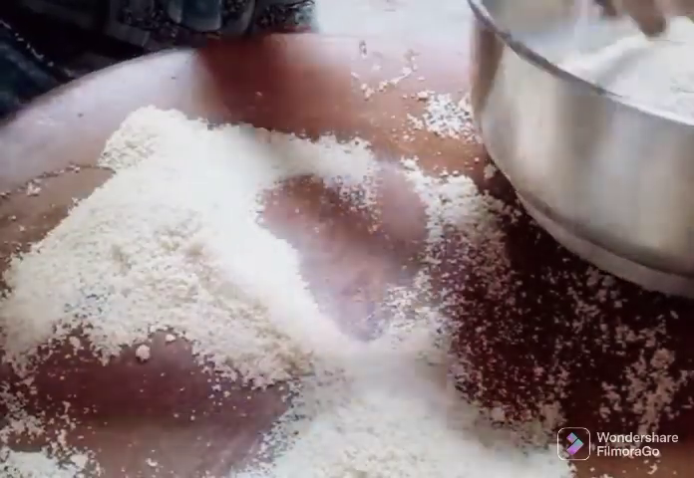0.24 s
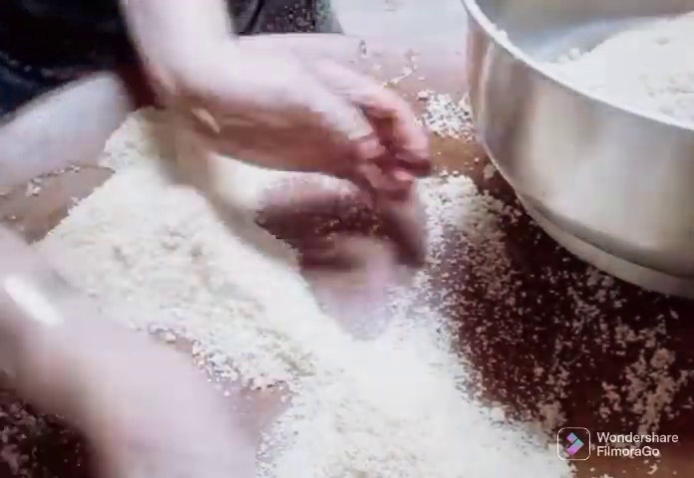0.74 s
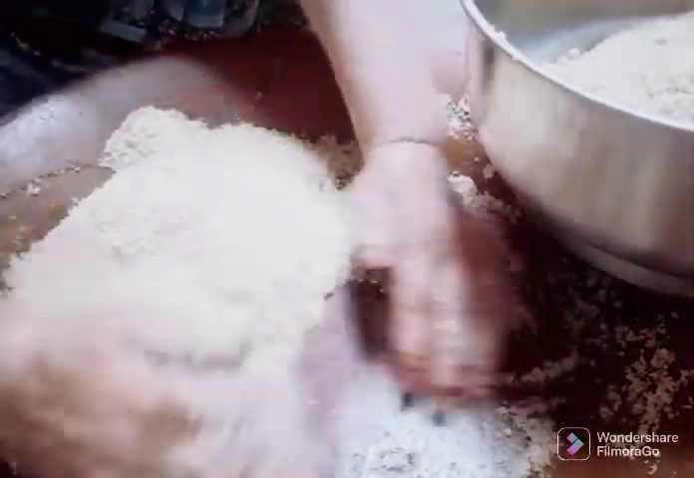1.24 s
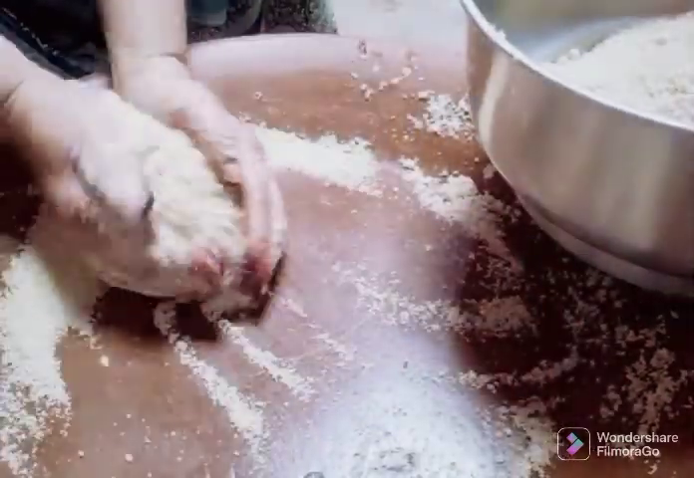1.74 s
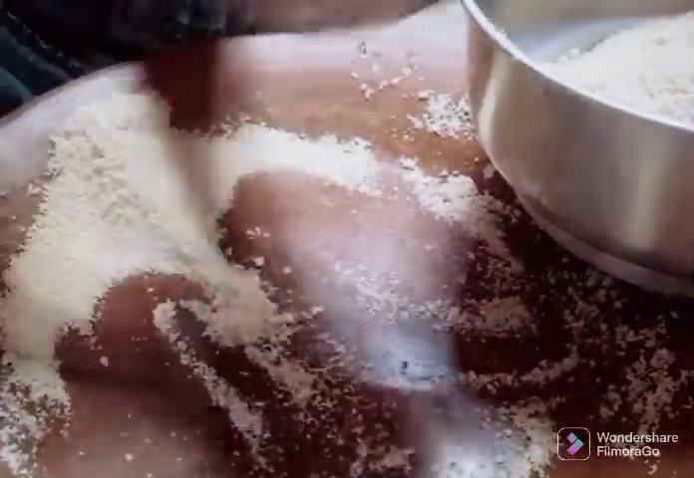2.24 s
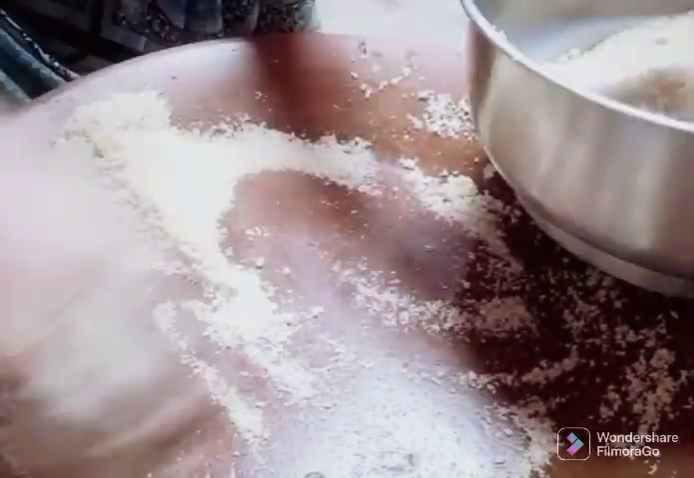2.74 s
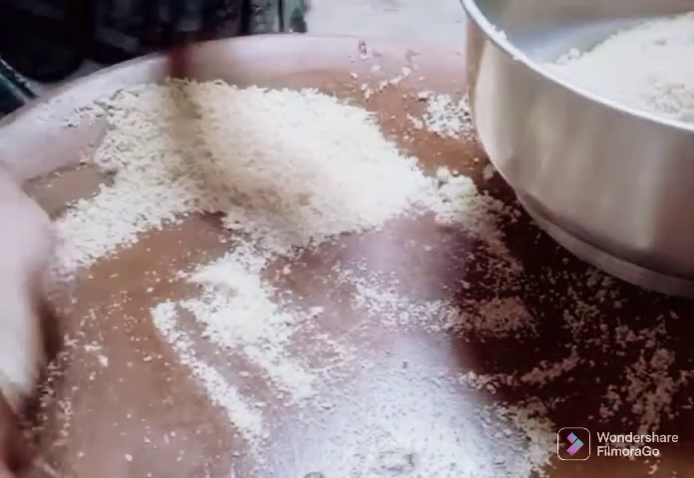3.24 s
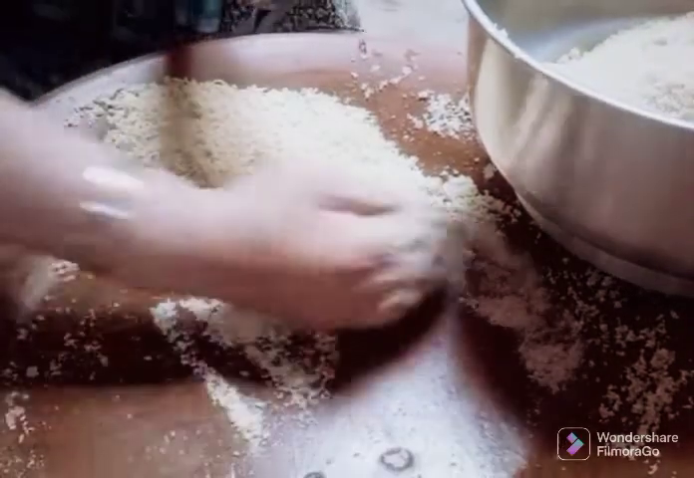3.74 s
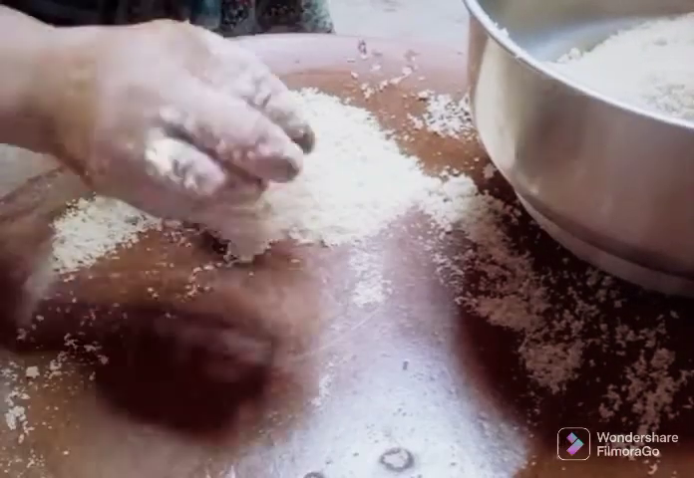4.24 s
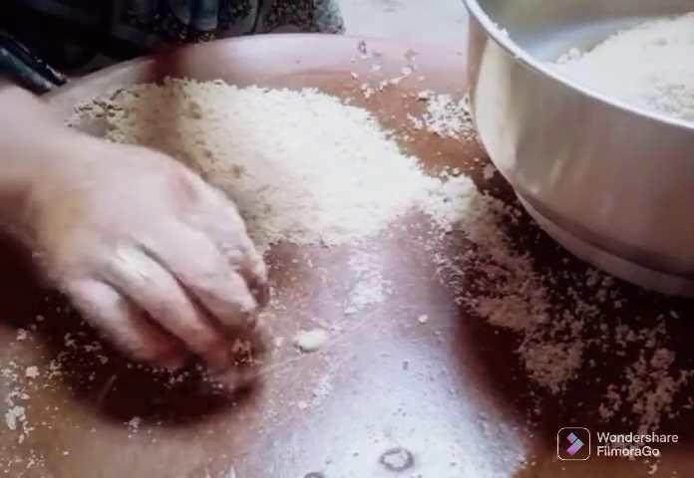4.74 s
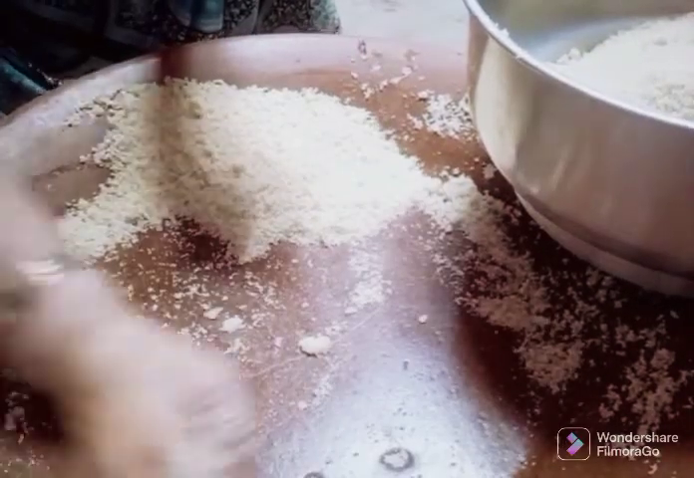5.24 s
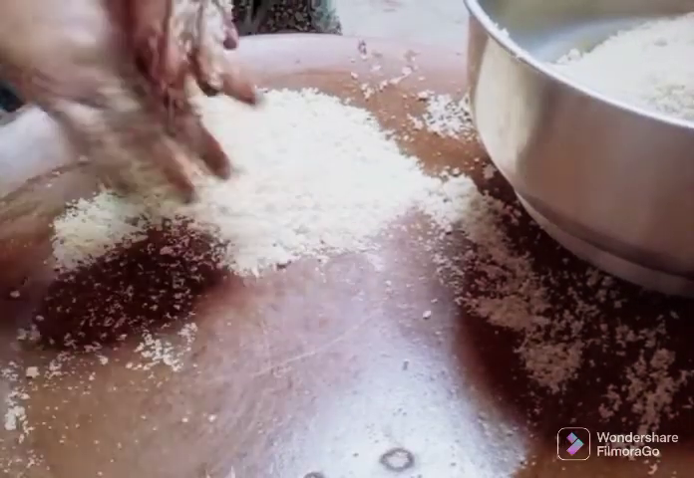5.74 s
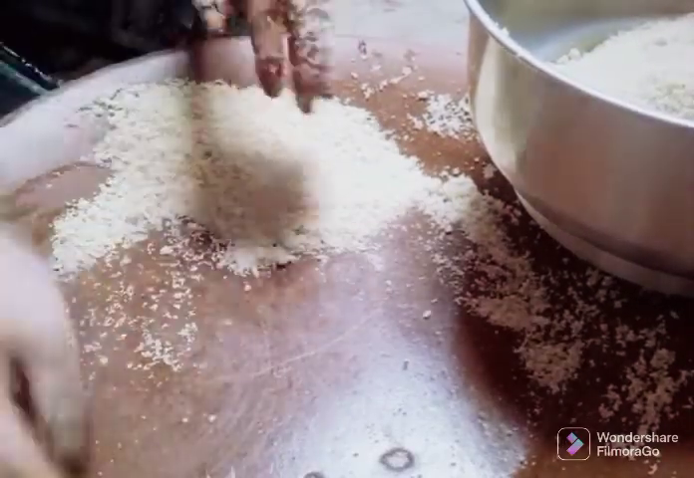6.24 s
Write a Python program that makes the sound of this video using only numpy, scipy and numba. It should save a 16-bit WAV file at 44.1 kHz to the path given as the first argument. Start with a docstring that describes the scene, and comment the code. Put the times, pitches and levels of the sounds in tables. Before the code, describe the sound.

Close up in a small quiet kitchen, hands sweep moist grain round a wooden platter in uneven gritty swishes with a hollow murmur under the palm. Early on, a small hard object clatters briefly. Pats and a firm slap follow, with a thin hiss of sliding grain. Later the platter knocks its support four times, loud and woody, the last a quick double, then rubbing continues.

```python
"""A soft, grainy swish comes and goes as hands rub and roll moist semolina round a wide wooden platter.
Each stroke drags many grains over the wood: they scrape, fizz, and drum the hollow under the palm and the platter.
The hands slap and pat now and then, loose grain patters and hisses, and a small hard thing clatters down.
Once the platter knocks four times on its support, the last knock a quick double; a small kitchen hums faintly.
Grain is random slips shaped by filters; struck things are fading sines, short pulses and noise bursts."""
import sys
import numpy as np
from scipy import signal
from scipy.fft import rfft, irfft
from scipy.io import wavfile
from numba import njit

SR = 44100
rng = np.random.default_rng(int(sys.argv[2]) if len(sys.argv) > 2 else 0)


def dump(signal):
    """Clip the signal to [-1, 1] and save it as 16-bit WAV at the path in sys.argv[1]."""
    limited = np.clip(np.atleast_2d(signal).T, -1, 1)
    pcm = np.round(limited * 32767).astype(np.int16)
    wavfile.write(sys.argv[1], SR, pcm)


N = 286322
TIME = np.arange(N) / SR
ROOM_T60_S, EAR_SPACING_S = 0.45, 0.00037  # fading of the room by 60 dB; sound's travel between the microphones
FLURRY_DB, FLURRY_RATE = 1.6, 22  # loose grain comes in flurries: spread in dB, changes a second

# sweeps of a hand over the grain: [full speed reached t/s, attack/s, hold/s, release/s,
# scrape level/dB, fizz of loose grain level/dB, hollow under the palm level/dB, platter rumble level/dB,
# cupping of the palm 0-1, hollow f/Hz, its glide/(octaves per s)]
STROKES = [(0.01, 0.058, 0.052, 0.14, -32, -44, -31.5, -42.5, 0.08, 522, 4.5),
           (0.302, 0.07, 0.035, 0.094, -36, -47, -37, -51, 0.42, 610, -4),
           (0.38, 0.04, 0.032, 0.14, -38.5, -47, -36.5, -46, 0.5, 710, -3),
           (0.804, 0.045, 0.023, 0.074, -37.5, -45, -37.5, -49, 0.4, 597, -8.5),
           (0.931, 0.029, 0.032, 0.12, -32, -42, -35, -45, 0.1, 660, -4.5),
           (1.093, 0.063, 0.059, 0.26, -41, -59, -46, -53.5, 0, 1030, -2.5),
           (1.187, 0.03, 0.03, 0.091, -50.5, -72, -45, -64, 0.5, 526, 2),
           (1.356, .10, 0.067, 0.027, -38.5, -51, -43.5, -78, 0.65, 960, -5.5),
           (1.487, 0.046, 0.034, 0.078, -33.5, -46, -30.5, -59, 0.72, 445, 2.5),
           (1.77, 0.025, 0.013, 0.028, -45.5, -60, -43, -45, 0.94, 240, 2),
           (1.812, 0.027, 0.0079, 0.019, -45, -47, -30, -35.5, 1, 490, -3),
           (1.88, 0.06, 0.036, 0.018, -30, -42, -27.5, -36.5, 0.4, 814, -1.5),
           (1.932, 0.025, 0.072, 0.06, -30.5, -46, -29, -47, 0.6, 638, -1),
           (2.015, 0.02, 0.021, 0.014, -42.5, -60, -37, -69, 0.91, 572, 1),
           (2.098, 0.034, 0.03, 0.035, -42, -48, -67, -71, 1, 533, 1),
           (2.232, 0.057, 0.038, 0.082, -33, -44, -39, -45, 0.97, 620, 1),
           (2.28, 0.058, 0.03, 0.11, -34, -52, -37.5, -46, 0.16, 610, -6),
           (2.513, 0.053, 0.014, 0.063, -32, -46, -39.5, -65, 0.48, 572, -4),
           (2.815, 0.061, 0.025, 0.036, -36.5, -47, -32.5, -38, 0.06, 730, -4),
           (2.897, 0.059, 0.06, 0.088, -29.5, -39, -29, -41, 0.27, 577, 0.1),
           (3.011, 0.03, 0.032, 0.09, -37, -58, -33.5, -45.5, 0.1, 636, -1),
           (3.237, 0.055, 0.026, 0.14, -31.5, -44.5, -31, -39, 0.01, 580, 2),
           (3.57, 0.12, 0.027, 0.1, -33, -40, -40, -47, 0.17, 622, -4.5),
           (3.805, 0.0056, 0.03, 0.059, -40, -44, -30.5, -47, 0.6, 484, 1),
           (3.902, 0.055, 0.13, 0.1, -29, -41.5, -31.5, -44.5, 0, 730, -1.5),
           (4.227, 0.016, 0.03, 0.034, -39.5, -47, -42, -54, 0.6, 1290, -6.5),
           (4.33, 0.091, 0.042, .14, -32.5, -48.5, -35.5, -41.5, 0, 718, -5.5),
           (4.598, 0.088, 0.021, 0.13, -37.5, -52, -43.5, -62, 0, 613, -8.5),
           (4.88, 0.019, 0.036, 0.047, -44, -53, -32, -48, 0.84, 510, 2),
           (4.99, 0.081, 0.099, 0.094, -29.5, -42, -32, -46, 0.04, 671, 0.5),
           (5.168, 0.044, 0.017, 0.034, -46.5, -68, -47, -69, 0.8, 612, 0.5),
           (5.374, 0.099, 0.039, 0.14, -30.5, -42.5, -35, -42, 0.1, 574, -3.5),
           (5.64, 0.013, 0.072, 0.051, -40, -46.5, -49, -56.5, 0.8, 610, -12),
           (5.961, 0.059, 0.078, 0.087, -30, -39.5, -33.5, -45, 0, 642, -2.5),
           (6.089, 0.072, 0.027, 0.099, -32.5, -54, -31.5, -56, 0.64, 544, 0.5),
           (6.187, 0.022, 0.024, 0.042, -52, -65, -41.5, -56, 0.55, 592, 0),
           (6.378, 0.099, 0.042, 0.26, -31.5, -44, -36, -42.5, 0.01, 585, 2.5)]
# colour of fizzing loose grain: [f/Hz, level per Hz/dB]
FIZZ_COLOUR = [(1500, -29), (3200, 2.5), (4200, -2.5), (5200, -2), (6300, 0), (7200, -9), (8200, -22.5),
               (9500, -31), (12000, -37.5), (15500, -36.5)]


def undb(db):
    """Turn decibels into a gain."""
    return 10 ** (np.asarray(db) / 20)


def unit(x):
    """Scale to an rms (average strength) of 1."""
    return x / np.sqrt(np.mean(x ** 2))


def log_gain(points, size):
    """Natural log of a colour's gain at each frequency of a transform."""
    hz, db = np.transpose(points)
    log_hz = np.log(np.fft.rfftfreq(size, 1 / SR) + 1)
    return np.log(undb(np.interp(log_hz, np.log(hz), db)))


def colour(x, points):
    """Filter by a list of (Hz, dB) points."""
    size = x.shape[-1]
    return irfft(rfft(x) * np.exp(log_gain(points, size)), size)


def pulse(points, size=2048):
    """A pulse of the given colour with its energy packed as early as possible, peak 1."""
    cepstrum = irfft(log_gain(points, size))
    # folding the second half onto the first makes the pulse start at once
    cepstrum[1:size // 2] *= 2
    cepstrum[size // 2:] = 0
    wave = irfft(np.exp(rfft(cepstrum)))
    return wave / np.abs(wave).max()


def fade(t, t60):
    """Fade exponentially, by 60 dB in t60 seconds."""
    return np.exp(-np.log(1000) * t / t60)


def add(out, s, sound):
    """Mix a sound in at time s."""
    start = int(s * SR)
    out[..., start:start + sound.shape[-1]] += sound[..., :N - start]


def walk(rate):
    """Wander between random values, rate of them a second, with a spread near 1."""
    values = rng.standard_normal(N // 20)
    return np.interp(TIME * rate, np.arange(N // 20), values) * np.sqrt(3 / 2)


def diffuse(size):
    """Noise from all sides on two spaced microphones: alike in the bass, unrelated in the treble."""
    alike = np.sinc(2 * np.fft.rfftfreq(size, 1 / SR) * EAR_SPACING_S)
    mid, side = rfft(rng.standard_normal((2, size))) * np.sqrt([1 + alike, 1 - alike])
    return unit(irfft([mid + side, mid - side], size))


def echoes(x, t60, delay_s):
    """A dense fading cloud of reflections of unit energy, on both microphones."""
    t = TIME[:SR // 2]
    cloud = diffuse(len(t)) * fade(t, t60) * (t >= delay_s)
    cloud /= np.sqrt(np.sum(cloud ** 2) / 2)
    return signal.fftconvolve(np.atleast_2d(x), cloud, axes=1)[:, :N]


@njit
def resonate(x, hz, width):
    """A resonance with a moving centre: two stored states swing at its pitch."""
    y, band, low = np.empty(len(x)), 0., 0.
    for i in range(len(x)):
        g, damping = np.tan(np.pi * hz[i] / SR), width / hz[i]
        v = (band + g * (x[i] - low)) / (1 + g * (g + damping))
        band, low, y[i] = 2 * v - band, low + 2 * g * v, damping * v
    return y


def cavity(x, hz, width_hz):
    """An air pocket: both channels pass two moving resonances, the second twice as wide; rms 1."""
    once = [resonate(side, hz, 1. * width_hz) for side in x]
    return unit(np.array([resonate(side, hz, 2. * width_hz) for side in once]))


def contact(rate):
    """Tiny uneven slips of single grains, rate a second, each with its own lag between the microphones."""
    spread_db = 4
    # the hands work left of centre, so the left microphone tends to hear them first
    left_lead_s, widest_lag_s = .000136, .0008
    share = np.clip(rate / SR, 1e-4, 1)
    size = undb(spread_db * np.clip(rng.standard_normal(N), -2, 2))
    slips = (rng.random(N) < share) * size * rng.choice([-1, 1], N)
    left = unit(slips / np.sqrt(share))  # even strength however many grains slip
    place = 2 * rng.random(N) - 1
    lag = np.round((left_lead_s + place * np.abs(place) * widest_lag_s) * SR).astype(int)
    right = np.bincount(np.clip(np.arange(N) + lag, 0, N - 1), left, N)
    return np.array([left, right])


def kitchen():
    """Faint room air, as slowly wavering noise, and the low hum of an appliance, as a wandering sine."""
    # colour of the quiet kitchen: [f/Hz, level per Hz/dB]
    air_colour = [(20, -31), (35, -10), (55, -12), (100, 5), (250, -8.5), (600, -18), (1500, 7),
                  (3000, -20.5), (6300, -28), (9000, -42.5), (15000, -49)]
    air_db, hum_hz, hum_db = -57, 49.5, -68
    air = unit(colour(diffuse(N), air_colour)) * undb(air_db + .8 * walk(3.0))
    hum = np.sqrt(2) * np.sin(2 * np.pi * hum_hz * TIME + .4 * walk(5))
    return air + undb(hum_db) * hum


def sprinkles(rate=900):
    """Flung grains patter on bare wood as tiny separate hits; each patter starts suddenly and fades."""
    # patters of loose grain: [t/s, level/dB, length/s]
    patters = [(0.06, -48, 0.085), (0.745, -59, 0.15), (0.937, -64, 0.073), (1.372, -58, 0.088),
               (2.60, -52.5, 0.13), (2.90, -57, 0.08), (3.17, -62, 0.055), (3.42, -58, .12),
               (3.56, -59, 0.1), (3.68, -54, 0.04), (3.976, -53, 0.095), (5.36, -56, 0.095),
               (5.63, -61, 0.05)]
    # colour of falling grain: [f/Hz, level per Hz/dB]
    patter_colour = [(3000, -11), (6200, -10), (7500, -7.5), (9000, -21.5), (14500, -27), (16000, -33)]
    t = TIME[:SR // 2]
    flow = np.zeros(N)
    for s, db, length_s in patters:
        add(flow, s, undb(db) * np.exp(-(t / length_s) ** 2))
    return unit(colour(contact(rate), patter_colour)) * flow * undb(FLURRY_DB * walk(FLURRY_RATE))


def pour(rise_s=0.028):
    """Loose grain slides off in a thin hiss: noise in a narrow treble band that dies away."""
    start_s, db, t60 = 2.604, -41.5, 0.8
    centre_hz, width_hz = 6050, 2500
    t, out = TIME[:SR // 2], np.zeros((2, N))
    hiss = cavity(colour(diffuse(len(t)), FIZZ_COLOUR), np.full(len(t), float(centre_hz)), width_hz)
    add(out, start_s, undb(db) * hiss * fade(t, t60) * (1 - fade(t, rise_s)))
    return out


def snap(t60, rise_s=0.0012):
    """The bright gritty snap of grains crushed in a hard contact: a short burst of coloured noise."""
    # colour of crushed grains: [f/Hz, level per Hz/dB]
    snap_colour = [(1500, -16), (3000, -9), (4300, -1.5), (5500, 4), (7000, -5), (8500, -28),
                   (15000, -42.5)]
    t = TIME[:SR // 20]
    return unit(colour(diffuse(len(t)), snap_colour)) * fade(t, t60) * (1 - fade(t, rise_s))


def clack(room_db=-11, contact_s=0.0011, pivot_hz=2000, scatter_db=2.5, snap_db=-3, snap_t60=0.015):
    """A small hard thing chatters down beside the platter, ringing unevenly, then settles with a bump."""
    # its quick contacts: [t/s, level/dB, tilt/(dB per octave)]
    contacts = [(0.6511, -33, -2.5), (0.655, -31, -3.5), (0.6602, -43, -5), (0.6665, -35, 0),
                (0.673, -39, 3), (0.6811, -37.5, -6.5)]
    # what it rings with: [f/Hz, level/dB, t60/s]
    modes = [(424, -1.5, 0.017), (845, -11.5, 0.12), (1100, -2.5, 0.071), (1590, -8, .06),
             (1992, -8.5, 0.063), (2260, -5, 0.08), (2820, 3, 0.15), (2977, -7, 0.12), (3250, -11, .07),
             (3580, -8.5, 0.067), (4850, -10.5, 0.08), (5600, -19, 0.03), (6340, -22, 0.025)]
    settle_s, settle_db, settle_length_s = .677, -35, 0.049
    settle_hz, sag_hz_per_s = 189, 300  # the low bump sags in pitch
    t, out = TIME[:SR // 4], np.zeros((2, N))
    for s, db, tilt_db in contacts:
        add(out, s, undb(db + snap_db + tilt_db) * snap(snap_t60))
        for hz, mode_db, t60 in modes:
            cycles = hz * t + rng.random() + 0.35 * rng.random((2, 1))
            mode = np.sin(2 * np.pi * cycles) * fade(t, t60)
            tilted_db = db + mode_db + tilt_db * np.log2(hz / pivot_hz)
            size_db = tilted_db + scatter_db * rng.uniform(-1.1, 1)
            add(out, s, undb(size_db) * mode * (1 - fade(t, contact_s)) ** 2)
    out = out + undb(room_db) * echoes(out[0], 0.4, 0.012)
    t = TIME[:int(settle_length_s * SR)]
    tone = np.sin(2 * np.pi * (settle_hz - sag_hz_per_s * t / 2) * t)
    add(out, settle_s, undb(settle_db) * tone * np.sin(np.pi * np.sqrt(t / t[-1])))
    return out


def pats(room_db=-8, soft_s=0.022, firm_s_per_hz=.00005):
    """Soft hands meet each other, the heap or the wood: short noise bursts; the lowest swell in gently."""
    # slaps, pats and catches: [t/s, level/dB, centre f/Hz, width/octaves, t60/s]
    touches = [(0.553, -34, 2000, 0.48, 0.1), (0.6523, -30.5, 1670, 0.76, 0.24),
               (.742, -38, 2300, 0.1, 0.11), (0.926, -45, 1810, 0.57, 0.081),
               (1.999, -31.5, 2500, 1.2, 0.13), (2.83, -31, 605, 0.3, 0.036), (2.85, -36, 170, 0.74, 0.18),
               (2.909, -22.5, 1610, 0.64, 0.16), (3.176, -42.5, 5000, 0.66, 0.25),
               (3.468, -36.5, 198, 0.2, 0.19), (3.526, -33, 2560, 0.32, 0.28),
               (3.7973, -30, 1640, 0.19, 0.27), (3.803, -33, 503, 0.19, 0.15),
               (3.821, -37, 560, 0.56, 0.041), (4.238, -31, 1370, 0.14, 0.13),
               (5.625, -35.5, 2080, 0.42, 0.65)]
    t, out = TIME[:SR // 4], np.zeros((2, N))
    hz = np.fft.rfftfreq(len(t), 1 / SR) + 1
    for s, db, centre_hz, octaves, t60 in touches:
        band = np.exp(-.5 * (np.log2(hz / centre_hz) / octaves) ** 2)
        band = band / (1 + (hz / 7000) ** 12)  # soft skin makes little treble
        burst = unit(irfft(rfft(diffuse(len(t))) * band, len(t)))
        rise_s = max(.001, soft_s - centre_hz * firm_s_per_hz)
        add(out, s, undb(db) * burst * fade(t, t60) * (1 - fade(t, rise_s)))
    return out + undb(room_db) * echoes(out[0], ROOM_T60_S, 0.0035)


def platter_ring(favoured_hz, favour_db=5, rise_s=0.014):
    """The platter's answer to one blow: fading sines, strongest near the pitch the contact favours."""
    # what the platter rings with: [f/Hz, level/dB, t60/s]
    platter_modes = [(150, -18.5, 0.37), (194, -14.5, 0.66), (247.7, -8, 0.25), (323, -11.5, 0.22),
                     (471.6, -9.5, 0.26), (530, -6, 0.39), (589.3, -8, 0.41), (637, -1, 0.079),
                     (677, -9, 0.18), (764.6, -3.5, 0.22), (851, -1, 0.17), (895, 7, 0.086),
                     (1030, -15, 0.22), (1360, -0.5, 0.029), (1520, -14.5, 0.18), (1820, -7, 0.13),
                     (2098, -2, 0.11), (2220, -6, 0.13), (2520, -17.5, 0.1), (2820, -8.5, 0.11),
                     (5400, -31.5, 0.029)]
    load_waver = .009  # the hand's shifting weight bends the pitch by about this share
    t = TIME[:SR * 3 // 5]
    hz, db, t60 = np.transpose(platter_modes)[:, :, None]
    # the drop is favour_db per octave, up to one octave away
    weight = undb(db - favour_db * np.minimum(np.abs(np.log2(hz / favoured_hz)), 1))
    # neighbouring modes radiate to opposite sides, so each reaches one microphone a little early
    lag = EAR_SPACING_S / 2 * (-1) ** np.arange(len(hz))[:, None]
    bent_time = np.cumsum(1 + load_waver * walk(39.6)[:len(t)]) / SR
    modes = np.array([np.sin(2 * np.pi * hz * (bent_time + side * lag / 2)) for side in (1, -1)])
    return np.sum(weight * modes * fade(t, t60), axis=1) * (1 - fade(t, rise_s))


def knocks(thud_room_db=-10, ring_room_db=-13, clonk_room_db=-15, tick_t60=0.11, tick_rise_s=0.0017,
           crack_db=11, snap_t60=0.014, snap_lag_s=0.0003, clonk_t60=0.096, clonk_lag_s=0.000085,
           bump_hz=120, bump_t60=0.042, soft_hz=1300, wall_low_hz=430, wall_high_hz=700):
    """The platter hits its support and rebounds: crack, thud, clonk at the contact, ring, walls' answer."""
    # the knocks: [t/s, ring level/dB, thud level/dB, tick level/dB, clonk level/dB, clonk f/Hz,
    # bump of the support level/dB, delay of the rebound/s, rebound level/dB, snap level/dB]
    blows = [(4.3892, -18, -1, -24.5, -7, 774, -24.5, 0.0038, 3, -27),
             (4.5578, -15, -4, -24, -7, 914, -18, 0.003, 1, -34.5),
             (4.704, -18.5, -3.5, -27, -8, 726, -14.5, 0.0035, 2, -27.5),
             (4.8323, -26, -11.5, -32.5, -23, 907, -43, 0.00389, 1.5, -31.5),
             (4.8399, -38, -9, -57, -25, 794, -24, 0.0047, -10, -50)]
    # colour of the dull thud: [f/Hz, level per Hz/dB]
    thud_colour = [(30, -50), (70, -53), (130, -3.5), (250, -9.5), (380, -0.5), (520, 6), (750, 4),
                   (1000, -1.5), (1300, -5.5), (1650, -17), (2200, -11), (2900, -24), (3600, -58.5),
                   (6300, -41), (12000, -74.5)]
    # colour of the sharp tick: [f/Hz, level per Hz/dB]
    tick_colour = [(800, -8), (2500, 13.5), (4000, -9), (5500, -7.5), (7000, -17.5), (9000, -33),
                   (15000, -44.5)]
    # colour of the first hard instant: [f/Hz, level per Hz/dB]
    crack_colour = [(500, 4), (1200, 18), (2600, -10.5), (4000, -7.5), (6500, -11.5), (9000, -32.5),
                    (15000, -41)]
    # near walls throw the thuds back, dulled: [delay/s, level/dB]
    wall_returns = [(.022, -13), (.0325, -19.5), (.045, -11), (.052, -23.5), (.073, -16)]
    t = TIME[:SR // 4]
    rings, clonks, ticks = np.zeros((3, 2, N))
    thuds, returns = np.zeros((2, N))
    hard = -pulse(thud_colour)
    # the rebound's thud is softer in the treble
    soft = signal.sosfilt(signal.butter(2, soft_hz, fs=SR, output="sos"), hard)
    for s, ring_db, thud_db, tick_db, clonk_db, clonk_hz, bump_db, rebound_s, rebound_db, snap_db in blows:
        ring = platter_ring(clonk_hz)
        for when, blow, thud in ((s, 1, hard), (s + rebound_s, undb(rebound_db), soft)):
            add(rings, when, blow * undb(ring_db) * ring)
            add(thuds, when, blow * undb(thud_db) * thud)
        clonk = np.array([np.sin(2 * np.pi * clonk_hz * (t + side * clonk_lag_s)) for side in (1, -1)])
        clonk = clonk * fade(t, clonk_t60) * (1 - fade(t, 0.0069))
        add(clonks, s + rebound_s, undb(clonk_db) * clonk)
        bump = np.sin(2 * np.pi * bump_hz * t) * fade(t, bump_t60) * (1 - fade(t, 0.016))
        add(thuds, s + rebound_s, undb(bump_db) * bump)
        tick = unit(colour(diffuse(len(t)), tick_colour))
        tick = tick * fade(t, tick_t60) * (1 - fade(t, tick_rise_s)) ** 2
        add(ticks, s, undb(tick_db) * tick)
        add(ticks, s, undb(tick_db + crack_db) * pulse(crack_colour))
        add(ticks, s + snap_lag_s, undb(snap_db) * snap(snap_t60))
    wall_band = signal.butter(1, [wall_low_hz, wall_high_hz], "band", fs=SR, output="sos")
    dull = signal.sosfilt(wall_band, thuds)
    for delay_s, db in wall_returns:
        add(returns, delay_s, undb(db) * dull)
    to_room = undb(thud_room_db) * thuds + undb(ring_room_db) * rings.mean(axis=0)
    to_room = to_room + undb(clonk_room_db) * clonks[0]
    return rings + thuds + clonks + ticks + returns + echoes(to_room, ROOM_T60_S, 0.011)


def landings(width_share=0.2):
    """A hand closes in on the platter: noise rings the air gap under it, and the pitch falls."""
    # approaches of a hand: [t/s, first f/Hz, level/dB]
    approaches = [(0.228, 2180, -38), (1.335, 2480, -43), (1.375, 1130, -38.5), (2.124, 1000, -53),
                  (2.423, 1250, -53), (2.558, 2100, -43.5), (4.23, 1300, -45), (5.219, 1790, -42),
                  (5.866, 1260, -44), (6.251, 1140, -43)]
    length_s, fall_octaves = .095, 0.47
    out, size = np.zeros((2, N)), int(length_s * SR)
    progress = np.arange(size) / size
    swell = np.sqrt(np.sin(np.pi * progress))
    for s, first_hz, db in approaches:
        hz = first_hz * 2 ** (-fall_octaves * progress)
        add(out, s, undb(db) * swell * cavity(diffuse(size), hz, width_share * hz.mean()))
    return out


def lumps(count=2600, low_hz=420, high_hz=3100, length_s=.011):
    """Each moist lump crumbles in a brief sine of its own pitch; some are much bigger than others."""
    out = np.zeros((2, N))
    for when, pitch, length, size, phase, place in rng.random((count, 6)):
        t = TIME[:int(length_s * (.5 + length) * SR)]
        hz = low_hz * (high_hz / low_hz) ** pitch
        phases = np.array([[phase], [phase + (place - .5) * pitch]])
        wave = np.sin(2 * np.pi * (hz * t + phases))
        add(out, when * TIME[-1], size ** 2 * wave * np.sin(np.pi * np.sqrt(t / t[-1])) ** 2)
    return unit(out)


def fingers(x, gap_hz=(1150, 1900), wander_octaves=0.22, width_hz=280, tint_db=-4, flicker_db=3):
    """The gaps between the fingers are small resonators that shift all the time and tint the scrape."""
    out = x
    for centre in gap_hz:
        hz = centre * 2 ** (wander_octaves * np.clip(walk(16), -2, 2))
        tint = undb(tint_db + flicker_db * walk(10))
        out = out + tint * np.array([resonate(side, hz, 1. * width_hz) for side in x])
    return out


def palm():
    """Cupping and pitch of the hollow: the pitch glides through each stroke, then both take their next value."""
    points = []
    next_s = [stroke[0] for stroke in STROKES[1:]] + [np.inf]
    for (s, attack, hold, release, *_, cupping, hz, glide), following_s in zip(STROKES, next_s):
        length = min(hold + release / 2, (following_s - s) * 2 / 3)
        points += [(s + t, cupping, hz * 2 ** (glide * t)) for t in (0, length)]
    s, cupping, hz = np.transpose(points)
    return np.clip(np.interp(TIME, s, cupping), 0, 1), np.interp(TIME, s, hz)


def stroke_level(stroke, steepness, lag_s):
    """Attack, hold and release of one stroke, in dB relative to its top."""
    # at steepness 1, down edge_db one attack before and one release after the hold, with rounded shoulders
    edge_db, edge_curve = 10, 1.4
    s, attack, hold, release = stroke[:4]
    t = TIME - s - lag_s
    away = np.clip(np.maximum(-t / attack, (t - hold) / release), 0, 10)
    return -steepness * edge_db * away ** edge_curve


def effort(levels_db, steepness, lag_s, rest_db):
    """One layer's gain: strokes overlap in power above the faint stirring of hands that never quite stop."""
    power = undb(rest_db) ** 2
    for stroke, db in zip(STROKES, levels_db):
        power = power + undb(db + stroke_level(stroke, steepness, lag_s)) ** 2
    return np.sqrt(power)


def rubbing(slip_rate=3800, usual_db=-38, judder_db=0.5, hollow_width_hz=480, pocket_db=0.0,
            cupped_db=-1, wood_db=-8.0, damped_t60=0.67, room_db=-9):
    """The palm drags grain over wood; faster strokes slip more grains, and the hand judders on the lumps."""
    # colour of the scrape: [f/Hz, level per Hz/dB]
    scrape_colour = [(300, -27.5), (700, -4.5), (1100, -1.5), (1700, -2.5), (2600, 0), (3300, -8.5),
                     (4300, -15), (6000, -48), (9000, -71)]
    # colour of the platter's rumble: [f/Hz, level per Hz/dB]
    rumble_colour = [(30, -32), (60, -15.5), (110, -13), (160, -13.5), (195, 0), (260, 7.5), (340, 4.5),
                     (420, 1.5), (800, -15), (2000, -72)]
    # how layers follow a stroke: steepness, lag in s, level between strokes in dB
    scrape_law, fizz_law = (1.01, 0.00093, -48.5), (0.84, 0.00067, -59)
    # the weight comes down after the speed
    hollow_law, rumble_law = (1.48, 0.016, -71), (1.57, 0.029, -61)
    lump_db, cupped_width_hz = -9, 55  # lumps against the scrape; a cupped palm rings narrowly
    scrape_db, fizz_db, hollow_db, rumble_db = np.transpose(STROKES)[4:8]
    speed = effort(scrape_db, *scrape_law)
    rate = slip_rate * np.sqrt(speed / undb(usual_db))  # slip_rate slips a second at the usual level
    judder = undb(judder_db * walk(90))
    scrape = unit(fingers(colour(contact(rate), scrape_colour)))
    scrape = unit(scrape + undb(lump_db) * lumps()) * speed
    fizz = unit(colour(contact(2 * rate), FIZZ_COLOUR)) * effort(fizz_db, *fizz_law)
    fizz = fizz * undb(FLURRY_DB * walk(FLURRY_RATE))
    # the pocket of air under the palm changes pitch; a cupped palm rings more sharply
    cupping, hz = palm()
    open_pocket = cavity(contact(rate), hz, hollow_width_hz) * undb(pocket_db)
    cupped_pocket = cavity(contact(rate), hz, cupped_width_hz) * undb(cupped_db)
    pocket = np.sqrt(1 - cupping) * open_pocket + np.sqrt(cupping) * cupped_pocket
    # the wood answers too, damped by the hand that rests on it
    ring = platter_ring(favoured_hz=538, favour_db=18.0)
    damped_ring = ring * fade(TIME[:ring.shape[1]], damped_t60)
    wood = signal.fftconvolve(contact(rate), damped_ring, axes=1)[:, :N]
    hollow = (pocket + undb(wood_db) * unit(wood)) * effort(hollow_db, *hollow_law)
    # only the bigger lumps shake the whole platter, so its slips are fewer
    rumble = unit(colour(contact(.5 * rate), rumble_colour)) * effort(rumble_db, *rumble_law)
    near = judder * (scrape + fizz + hollow) + rumble + landings()
    return near + undb(room_db) * echoes(near[0], 0.072, 0.00252)


def scene(left_db=0.65):
    """The hands' work is a little louder on the left; the kitchen surrounds it."""
    work = rubbing() + knocks() + pats() + clack() + pour() + sprinkles()
    return work * undb([[left_db], [-left_db]]) + kitchen()


def record(dry, low_cut_hz=42):
    """The phone drops the deepest bass, clips at full scale and cuts the top."""
    top_hz = 15500
    thin = signal.sosfilt(signal.butter(4, low_cut_hz, "high", fs=SR, output="sos"), dry)
    top_cut = signal.ellip(8, .2, 70, top_hz, fs=SR, output="sos")
    return signal.sosfilt(top_cut, np.clip(thin, -1, 1))


dry = scene()
out = record(dry)
dump(out)
```